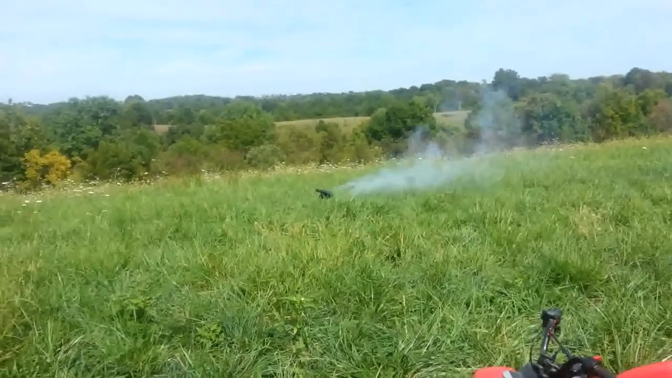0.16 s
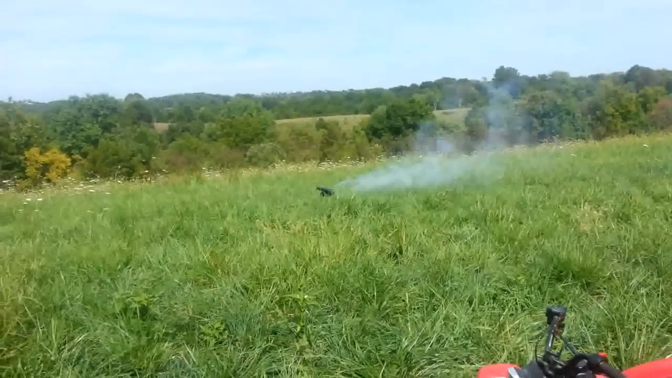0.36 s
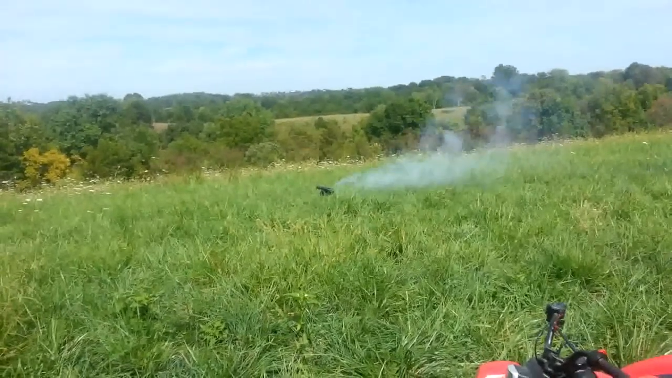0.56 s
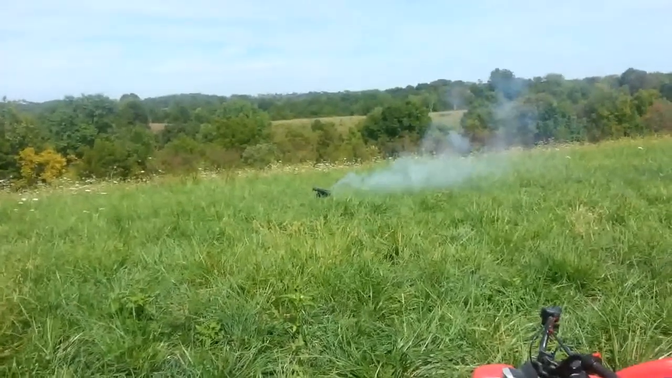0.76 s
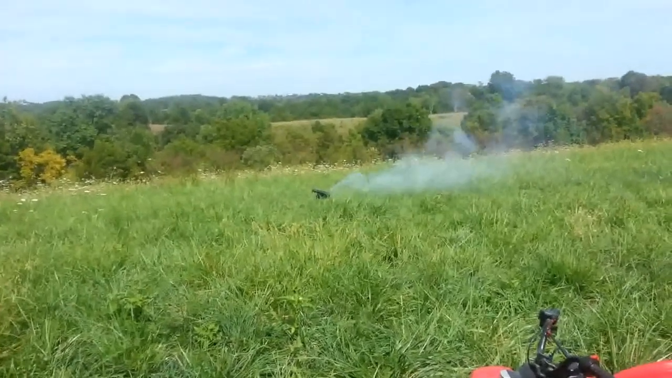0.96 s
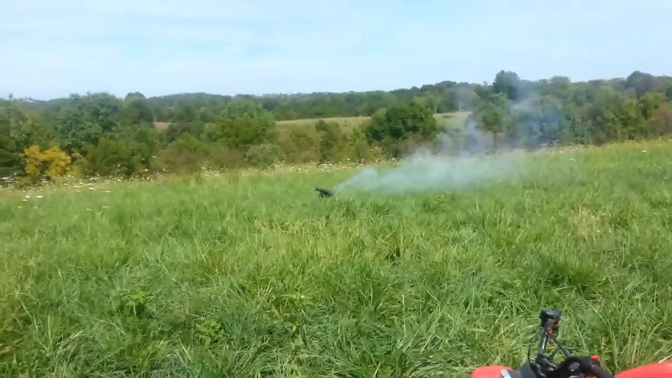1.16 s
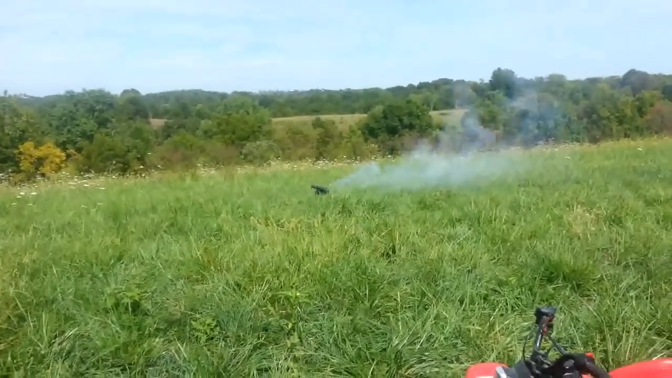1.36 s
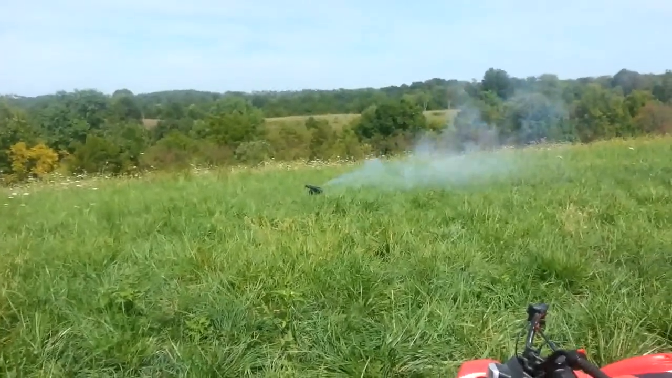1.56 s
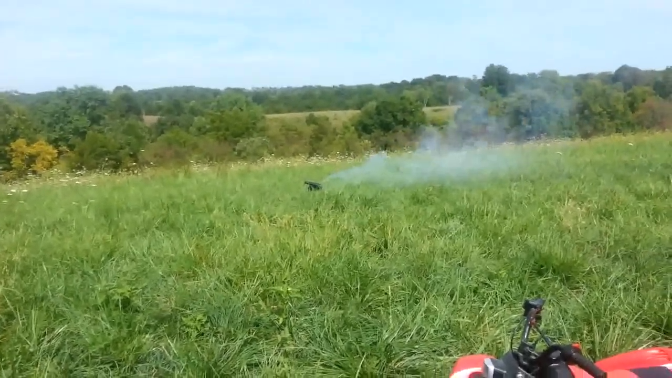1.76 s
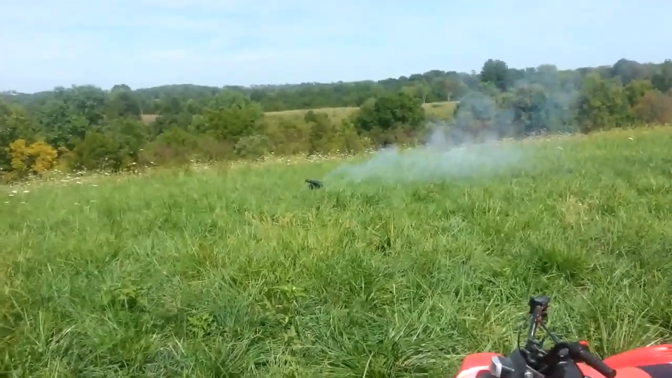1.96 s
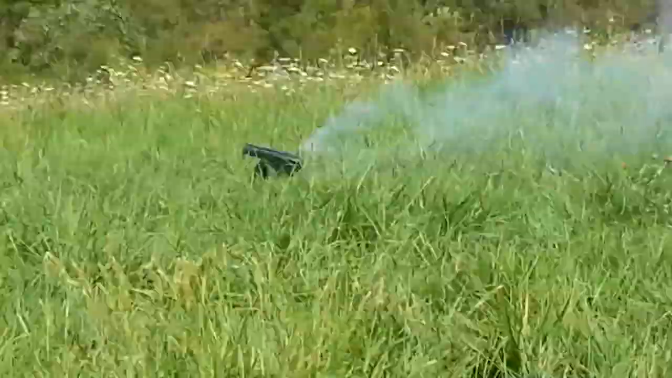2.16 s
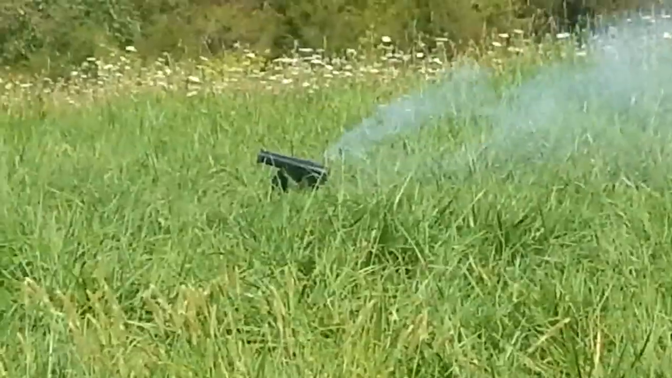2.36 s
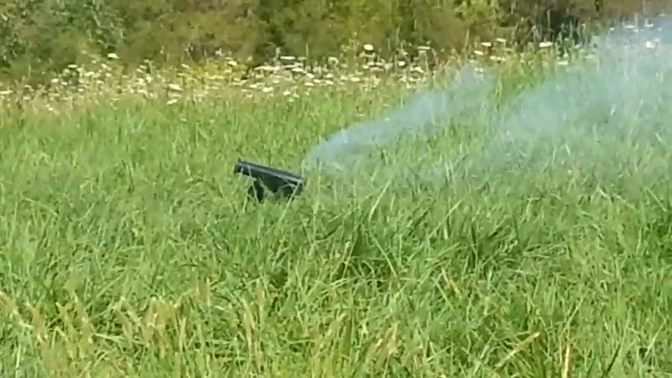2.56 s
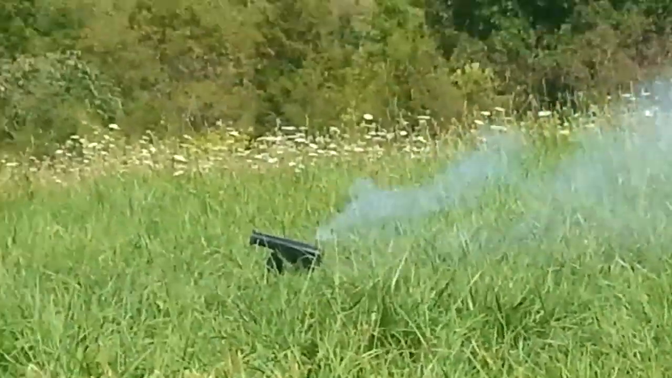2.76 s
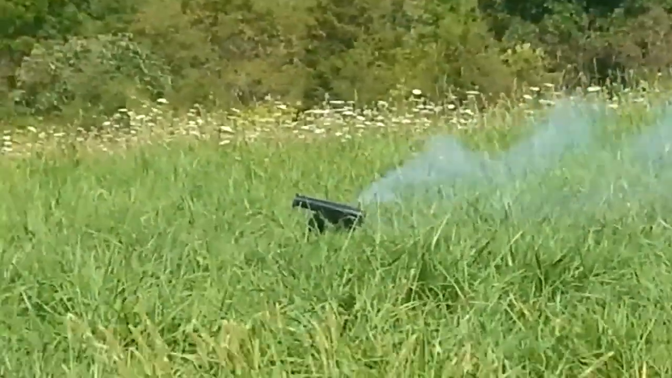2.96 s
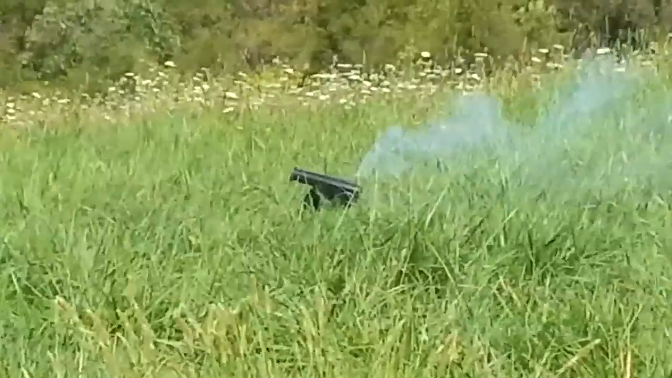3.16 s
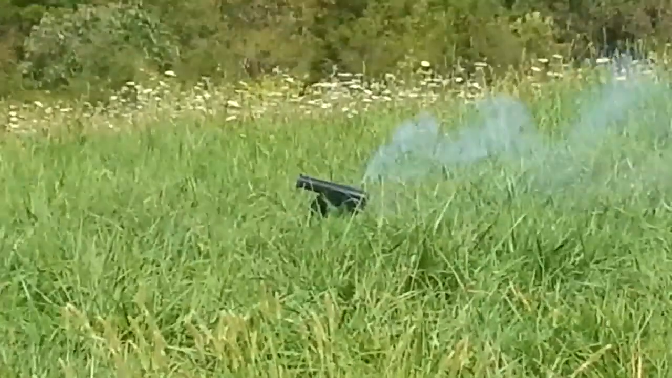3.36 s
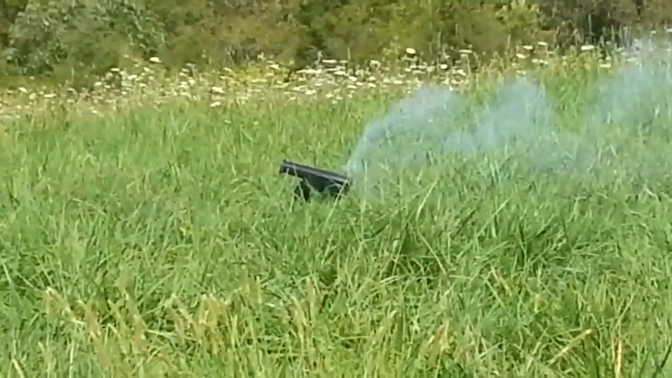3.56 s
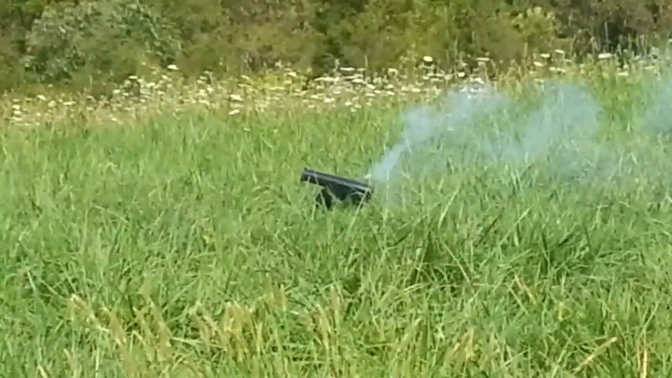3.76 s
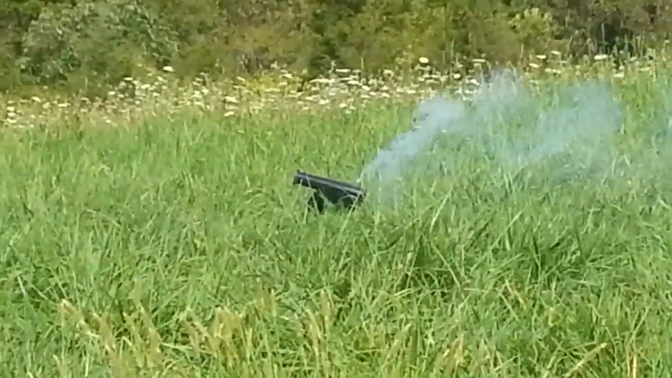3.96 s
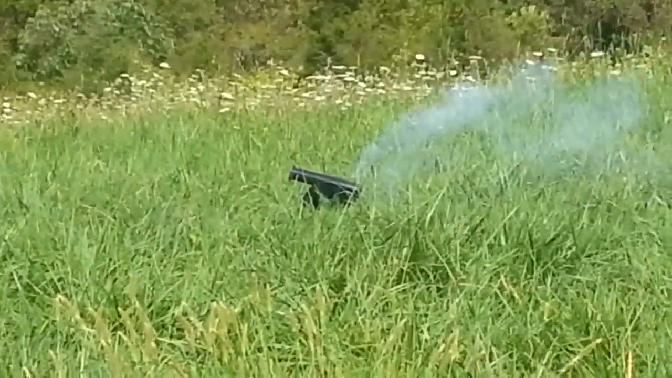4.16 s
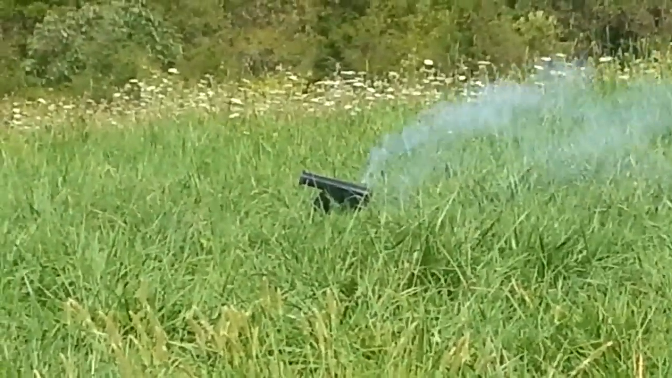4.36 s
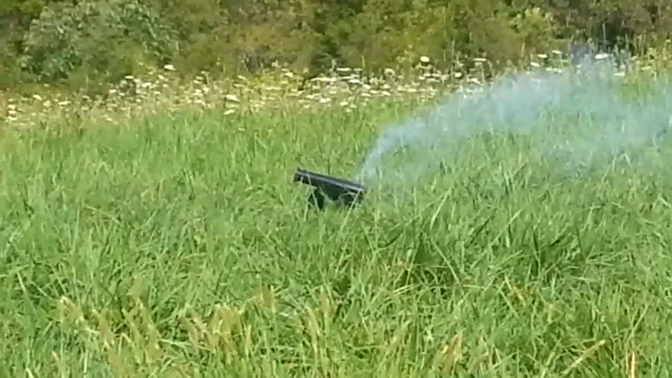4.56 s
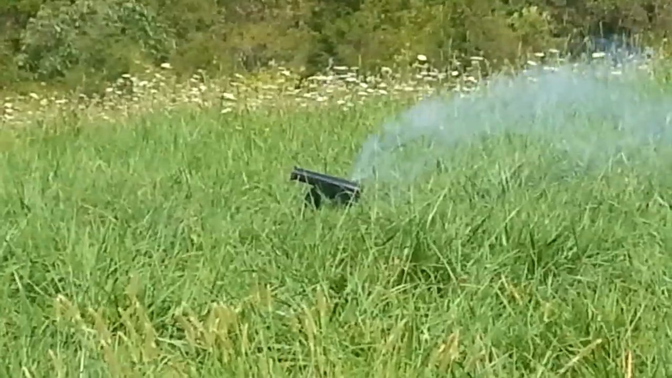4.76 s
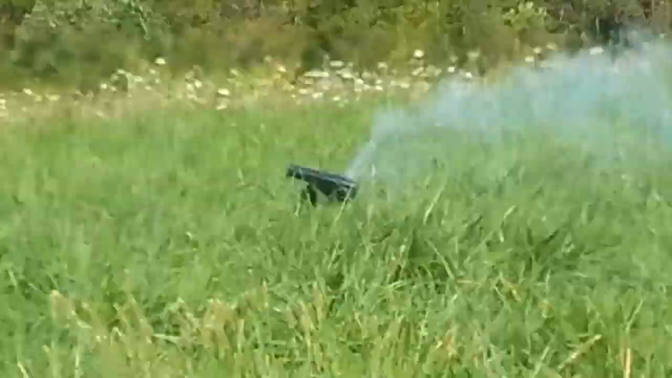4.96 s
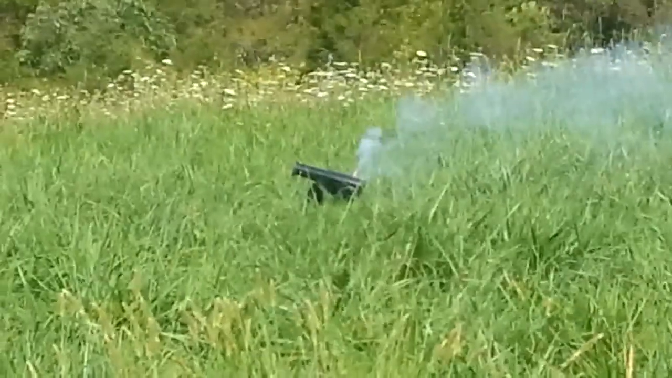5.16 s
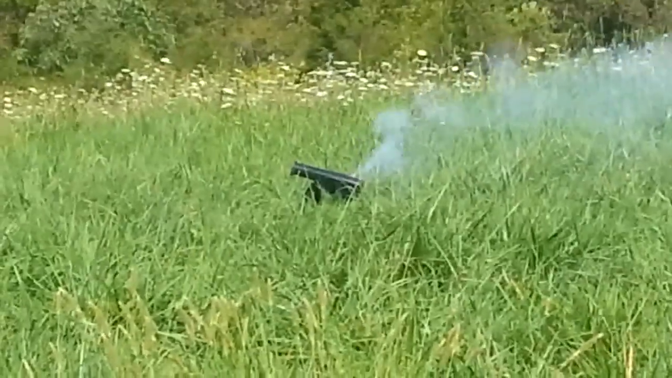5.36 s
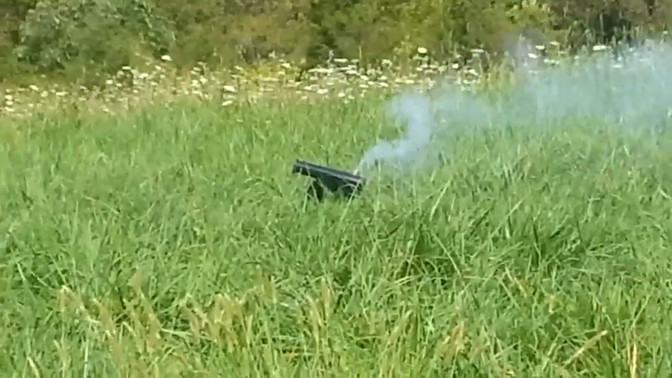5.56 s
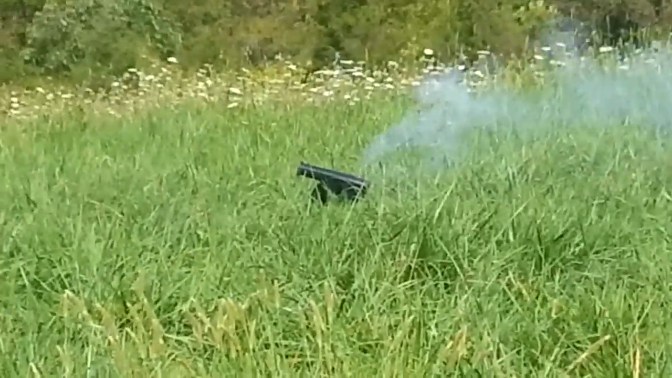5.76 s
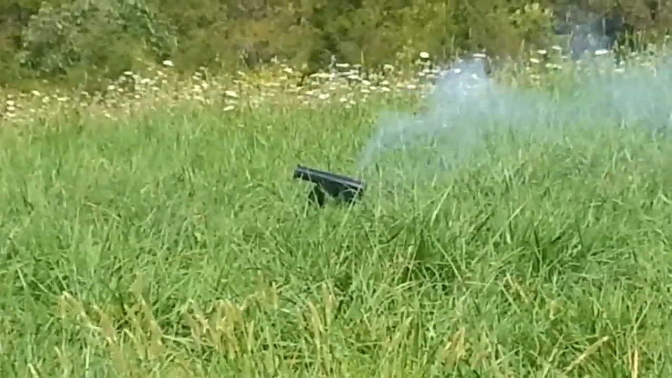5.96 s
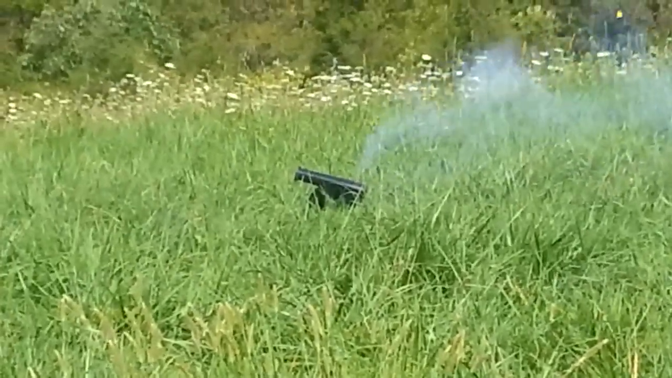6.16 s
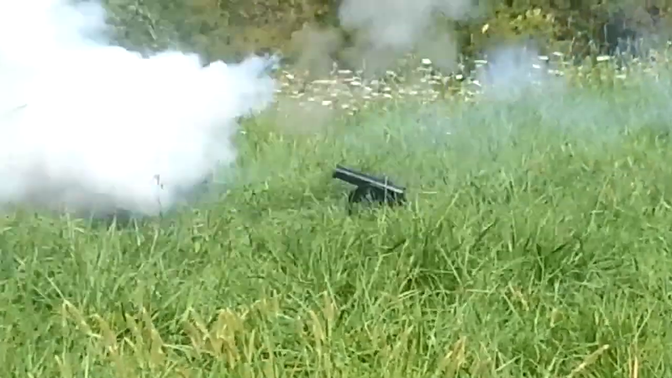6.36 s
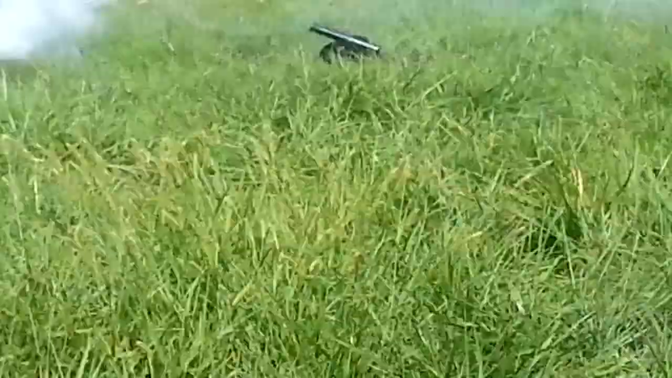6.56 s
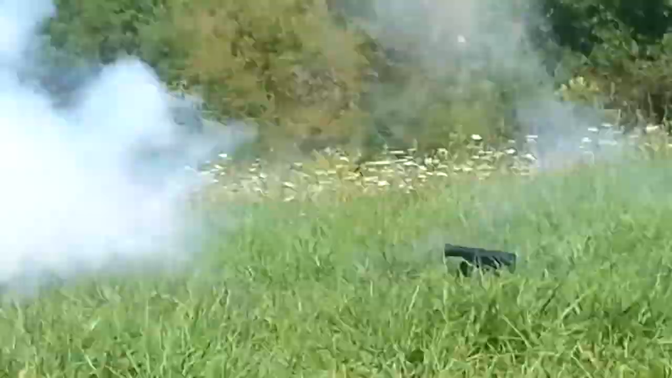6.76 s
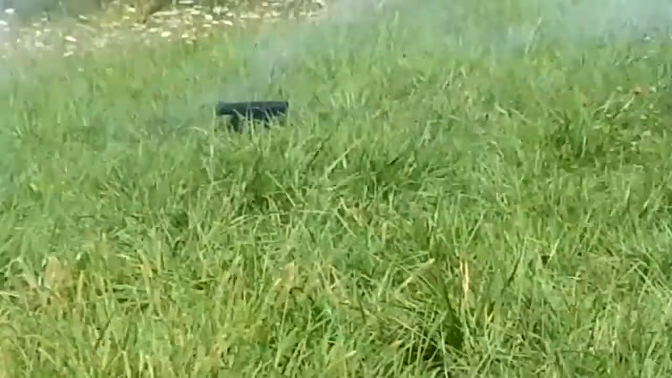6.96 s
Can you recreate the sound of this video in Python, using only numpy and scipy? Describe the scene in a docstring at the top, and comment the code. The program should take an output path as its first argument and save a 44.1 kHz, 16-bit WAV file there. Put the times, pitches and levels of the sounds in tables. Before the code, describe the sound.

Camera microphone outdoors, some way from a small cannon: very quiet field air, high shimmering insects and a thin sputtering fuse hiss. Close dry taps and tiny skin rubs on the camera come mostly in the first half. A lone cricket calls briefly around five seconds, the fuse strengthens, then a violent shot overloads the microphone, rolls over the field, returns from the woods and quickly dies away.

```python
"""A summer meadow: crickets, katydids and soft air, all coloured noise or swept tones gated by wing strokes.
A fuse hisses faintly from the start, while fingers tap and rub on the camera: short rings and friction noise.
A katydid stops buzzing to tick for a while and buzzes again; a tree cricket calls once, shortly before
the fuse flares. Then a small black powder cannon fires: shock pulses and shaped roars overload the
microphones, boom over the field and come back bright from the tree line."""
import sys
import numpy as np
from scipy import signal
from scipy.fft import rfft, irfft, next_fast_len
from scipy.io import wavfile
from scipy.ndimage import uniform_filter1d

SR = 44100
rng = np.random.default_rng(int(sys.argv[2]) if len(sys.argv) > 2 else 0)


def output_pcm(signal):
    """Save a mono or channel-first signal as 16-bit PCM at the path in sys.argv[1].

    Samples are clipped to [-1, 1] before scaling.
    """
    pcm = np.clip(np.atleast_2d(signal).T, -1, 1) * 32767
    wavfile.write(sys.argv[1], SR, np.round(pcm).astype(np.int16))


N = 309564
TIME = np.arange(N) / SR
SIZE = next_fast_len(N, True)
HZ = np.maximum(np.fft.rfftfreq(SIZE, 1 / SR), 1)


def cannon():
    """Shock pulses, the roar of the muzzle gas, the boom over the ground and the echo from the trees."""
    # The paths of the shot: touch hole flash, muzzle blast, gas jet, scatter from the grass; first thump,
    # its roll over the field, its return from the slope, far rumble; edge of the wood, trees behind it.
    # Each row: colour, start in seconds, attack in s, hold in s, level in dB before overload,
    # fall in dB per s, treble tilt in dB per octave, dulling in dB per octave per s.
    arrivals = [("blast", 6.452, 0.019, .001, -29, 800, 1, 5),
                ("blast", 6.469, 0.012, .001, 7.6, 720, 1, 235),
                ("blast", 6.484, 0.0096, 0.02, -2.4, 285, 1.55, 65),
                ("blast", 6.52, 0.026, .05, -17, 41, 0, 68),
                ("boom", 6.467, 0.016, 0.0017, 0.89, 310, .1, 5),
                ("boom", 6.513, 0.013, 0.024, -3.04, 91, .1, 3.5),
                ("boom", 6.605, 0.018, 0.068, -11.5, 127, -1.2, 5),
                ("boom", 6.75, 0.11, .05, -23.5, 15, -1, 3),
                ("trees", 6.703, 0.04, 0.05, -6.5, 91, 3.76, 45.4),
                ("trees", 6.77, 0.086, 0.045, -10, 27, -1.5, 20)]
    sound = shock_slaps()
    for colour, *shape in arrivals:
        sound = sound + scattered(roar(colour), *shape)
    return sound


def shock_slaps(pulse_top_hz=5000, crack_t60=0.0039):
    """The shock wave and its distinct reflections: each a pulse with a short crack."""
    # Each row: start in seconds, level in dB before the pulse is band-passed, pulse length in ms,
    # crack in dB relative to the pulse, left-right difference in dB.
    slaps = [(6.4735, -5, 2.9, -8, -1), (6.59, -7, 1.4, -15, 3), (6.598, 1, 2.7, -30, -12),
             (6.606, 1.5, 7.4, -32, 7), (6.614, 3, 4.3, -34, 3), (6.622, -3, 4.1, -28, 2),
             (6.649, -17, 1.6, -20, 14), (6.689, -0.5, 0.87, -42, 4), (6.7118, -3.5, 0.72, -12, 16),
             (6.895, -14, 2.3, -7, -8), (6.941, -17, 1.4, -31, -3)]
    shocks, t = np.zeros((2, N)), TIME[:SR // 20]
    for s, db, length_ms, crack_db, pan_db in slaps:
        age = t / (length_ms / 1000)
        overpressure = (1 - age) * np.exp(-age)   # a sudden overpressure, then suction
        pulse = band(overpressure, 130, pulse_top_hz)
        crack = from_db(crack_db - 60 * t / crack_t60) * rng.standard_normal(len(t))
        add(shocks, s, panned(from_db(db) * (pulse + crack), pan_db))
    return shocks


def scattered(noise, start_s, attack_s, hold_s, db, fall_db_per_s, tilt_db, dulling_db_per_s):
    """The shot smeared along one path: it swells, holds and dies; later sound came farther and lost treble."""
    start = int(start_s * SR)
    age, rest, out = TIME[:N - start], noise[:, start:], 0
    fall_db = fall_db_per_s * np.maximum(age - attack_s - hold_s, 0)
    envelope = np.minimum(age / attack_s, 1) ** 2 * from_db(db - fall_db)
    # peel off one band after another, from the lowest up
    for octave, edge_hz in enumerate([2000, 4000, 8000, 20000]):
        low = signal.sosfiltfilt(signal.butter(2, edge_hz, fs=SR, output="sos"), rest)
        out = out + low * from_db((tilt_db - dulling_db_per_s * age) * octave)
        rest = rest - low
    return np.pad(out * envelope, [(0, 0), (start, 0)])


def roar(colour, lumps_db=2.5, echo_db=0.5, clumps_db=2.5):
    """The noise of one kind of path: uneven ground makes the boom lumpy, clumps of trees roughen the echo."""
    # Colours of the blast, the boom and the echo from the trees.
    # Each row: frequency in Hz, relative level in dB per Hz.
    blast = [(25, -8.5), (100, 0), (220, 1.5), (700, -4.5), (1200, -1.5), (2400, -4), (4500, 0.5),
             (6000, -6.5), (10000, -8.5), (14500, -11)]
    boom = [(25, -29), (60, -43), (130, -5.5), (220, -4), (350, 1), (680, 2), (1000, -7.5), (1500, -8.5),
            (2400, -8.5), (4000, -20), (6000, -23.5), (14500, -50)]
    trees = [(25, -28), (200, -15.5), (350, -27), (700, 4), (1200, 2), (1700, 1), (2300, 5), (3000, -1.5),
             (4500, -1.5), (6000, -10), (10000, -24), (14500, -40)]
    if colour == "blast":
        return fan_noise(blast, lag_ms=0.4, spread_ms=0.1, shared=0.53)
    if colour == "boom":
        lumps = from_db(lumps_db * drift(110))
        return fan_noise(boom, lag_ms=0.37, spread_ms=0.1, shared=0.016) * lumps
    # the faster drift has stopped before the shot: it only sets a chance level for each echo
    ragged = from_db(echo_db * drift(400) + clumps_db * drift(70))
    return panned(fan_noise(trees, lag_ms=0.36, spread_ms=0.11, shared=.02) * ragged, pan_db=2.5)


def fan_noise(spectrum, lag_ms, spread_ms, shared):
    """A dense, even roar: a share is identical in both channels, the rest reaches the left later."""
    turn = 2 * np.pi * HZ / 1000   # radians per ms
    shared = np.clip(shared, 0, 1)
    fan = np.exp(-(turn * spread_ms) ** 2 / 2 - 1j * turn * lag_ms)
    noise = stereo_noise(spectrum, shared + (1 - shared) * fan, 0)
    power = uniform_filter1d(np.mean(noise ** 2, axis=0), size=700)
    return noise / np.sqrt(power)


def handling(snap_t60=0.0046, body_db=-2.5, crack_db=-0.5, grit_db=-9.5,
             upper_ratio=2.25, upper_db=-9.5, low_share=0.7, panel_db=8.5):
    """Finger taps: each a sharp snap, a dull knock and a two-mode ring, mostly at the nearer microphone."""
    # Fingers tapping the camera. Each row: start in seconds, level in dB before the last band-pass,
    # ring in Hz, ring t60 in s, snap in dB relative to the ring, left-right difference in dB.
    taps = [(0.335, -39.5, 1040, 0.029, -14, -4), (0.6933, -25.5, 1055, 0.034, -2, -3),
            (1.59, -40.5, 407, .025, -12, 19), (1.9025, -26.5, 500, 0.057, -1, 24),
            (1.9076, -4.5, 447, 0.01, -1.5, 19), (1.9194, -18.5, 1940, 0.0045, 5.5, 24),
            (2.176, -42, 520, 0.016, -11, 12), (2.408, -38.5, 635, 0.018, -8, 5),
            (2.469, -41, 560, 0.015, -5, 22), (3.0, -41.5, 530, 0.026, -16, 21),
            (3.016, -40.5, 202, 0.015, -11, 32), (3.084, -32, 487, 0.026, -12, 20),
            (3.155, -43.5, 534, 0.039, -9, 23), (3.23, -33.5, 910, 0.014, -9, -2),
            (3.244, -34, 440, 0.018, -5, 27), (3.251, -42, 810, 0.039, -10, 24),
            (4.423, -43, 844, 0.022, -15, -4), (5.845, -42.5, 230, 0.023, -26, 1),
            (6.169, -45.5, 250, 0.028, -20, 6)]
    out, t = np.zeros((2, N)), TIME[:SR // 16]
    for s, db, hz, t60, snap_db, pan_db in taps:
        grit, fade = rng.standard_normal((2, len(t))), from_db(-60 * t / t60)
        knock = from_db(body_db) * rms_one(band(grit[0], hz / 2, hz * 2))
        # the upper mode fades here and again below, so it dies twice as fast
        upper = from_db(upper_db) * np.sin(2 * np.pi * upper_ratio * hz * t) * fade
        ring = (np.sin(2 * np.pi * hz * t) + upper + knock) * fade
        contact = from_db(grit_db - 60 * t / snap_t60) * grit[1] - from_db(crack_db) * (t == 0)
        dulled = signal.lfilter([1], [1, -.7], band(contact, 340, 9000))
        panel = from_db(panel_db) * band(contact, 1460, 2870)
        snap = from_db(snap_db) * (dulled + panel)
        # a small shell radiates little below its lowest mode
        tap = band(ring + snap, low_share * hz, 26000)
        add(out, s, panned(from_db(db) * tap, pan_db))
    return out


def rubbing():
    """Skin slipping on the shell: short swells of friction in one resonance."""
    # Fingers rubbing and creaking on the camera.
    # Each row: middle in seconds, level in dB, resonance in Hz, width in Hz, length in s.
    rubs = [(1.671, -53, 380, 70, 0.033), (1.793, -56, 338, 60, 0.065), (1.999, -38.5, 780, 400, 0.0054),
            (2.261, -52.5, 1320, 400, 0.01), (2.522, -48, 1370, 350, 0.022),
            (3.224, -44.5, 1090, 250, 0.029), (3.225, -46.5, 650, 500, 0.033),
            (3.781, -47.5, 890, 920, 0.038), (3.898, -53, 1200, 1310, .09), (5.683, -52, 647, 220, 0.057)]
    out, t = np.zeros((2, N)), TIME[:SR // 2] - 1 / 4
    for s, db, hz, width_hz, length_s in rubs:
        low_hz, high_hz = max(hz - width_hz / 2, 60), hz + width_hz / 2
        friction = rms_one(band(rng.standard_normal(len(t)), low_hz, high_hz))
        swell = np.exp(-2 * (t / length_s) ** 2)
        add(out, s + t[0], from_db(db) * friction * swell)
    return out


def katydid(buzz_db=-2.5, pause_db=-67.0, depth=0.65, tick_s=0.0033, tick_db=-46, tick_arch_db=4):
    """A wing-scraped file: fast strokes buzz, single ones tick; others buzz faintly far off."""
    # Buzzes either side of the ticking. Each row: start in seconds, end in s, level in dB before buzz_db.
    buzzes = [(-.45, 2.78, -41.5), (4.65, 6.5, -41.5)]
    # Single wing strokes. One column: time in seconds.
    ticks_s = [3.3228, 3.4046, 3.4784, 3.5518, 3.6331, 3.7294, 3.7987, 3.873, 3.9568, 4.0416, 4.1294,
               4.2382, 4.323, 4.4128, 4.526, 4.6153, 4.748]
    # Colour of the scrape. Each row: frequency in Hz, relative level in dB per Hz.
    scrape = [(7000, -23), (8400, -8.5), (9100, -6.5), (9700, -3.5), (10300, -1), (10800, -2), (11400, 0),
              (12200, -5), (13200, -6), (14500, -5.5)]
    stroke = stroke_phase(91.7, .006)
    pulsing = rms_one(1 + depth * np.cos(2 * np.pi * stroke))
    buzz = from_db(buzz_db) * phrases(buzzes, attack_s=1.54, release_s=0.05) * pulsing
    ticks, t = np.zeros((1, N)), TIME[:SR // 20] - 1 / 50
    # the strokes grow louder to the middle of the run, then fade
    arches = np.sin(np.linspace(0, np.pi, len(ticks_s)))
    for s, arch in zip(ticks_s, arches):
        bump = np.exp(-(t / tick_s - 1) ** 2 / 2)
        add(ticks, s + t[0], from_db(tick_db + tick_arch_db * arch) * bump)
    return np.hypot(buzz + ticks, from_db(pause_db)) * field_noise(scrape, pan_db=-11.0)


def tree_cricket(rate_hz=30.2, low_hz=3150, high_hz=3700):
    """One short pulsed call: a burst of wing strokes, lower in pitch than the ground crickets."""
    # The call. Each row: start in seconds, end in s, level in dB.
    calls = [(5.03, 5.29, -58.5)]
    strokes = np.sin(np.pi * rate_hz * (TIME - calls[0][0]) - np.pi / 2) ** 8
    rasp = rms_one(band(rng.standard_normal(N), low_hz, high_hz) * strokes)
    return panned(phrases(calls, attack_s=0.046, release_s=.03) * rasp, pan_db=-1.5)


def near_cricket(pitch_hz=7850, fall_hz=1000):
    """The nearest ground cricket: a tone whose pitch falls in every wing stroke."""
    # Its songs. Each row: start in seconds, end in s, level in dB.
    songs = [(-.2, 2.9, -55), (4.5, 9.9, -56.5)]
    stroke = stroke_phase(29.2, .015)
    # the chance wavering of the pitch stops early in the second song and leaves one offset
    sweep_hz = pitch_hz - fall_hz * (stroke - .5) + 130 * drift(300)
    phase = 2 * np.pi * np.cumsum(sweep_hz) / SR
    # a quarter turn between left and right
    chirp = rms_one(np.sin(np.pi * stroke) ** 2 * np.array([np.cos(phase), np.sin(phase)]))
    return panned(phrases(songs, attack_s=.55, release_s=0.95) * chirp, pan_db=-3.0)


def cricket_crowd(crowd_db=-0.5):
    """A high trilling crowd of ground crickets: a narrow band of noise at a slowly moving level."""
    # Each row: time in seconds, level in dB before crowd_db.
    levels = [(0.25, -54), (2.22, -49.5), (3.91, -52), (5.51, -52.5), (6.3, -51.5)]
    # Each row: frequency in Hz, relative level in dB per Hz.
    trill = [(6600, -42), (7300, -12), (7650, -8), (8150, -7.5), (8500, -11), (9300, -44)]
    return from_db(in_time(levels)[0] + crowd_db) * field_noise(trill, pan_db=3.0)


def far_chorus(steady_db=-54, flutter_db=1.5):
    """A far chorus: a fluttering band of noise with a few swells over its steady level."""
    # Swells, added in power. Each row: start in seconds, end in s, level in dB before flutter.
    swells = [(1.9, 2.85, -53), (4.12, 4.42, -52), (5.85, 6.15, -51)]
    # Each row: frequency in Hz, relative level in dB per Hz.
    chorus = [(2800, -36), (3250, -1.5), (3600, 3), (4350, 3.5), (4800, -0.5), (5500, -4), (6300, -39)]
    swell = np.hypot(from_db(steady_db), phrases(swells, attack_s=0.053, release_s=0.24))
    return swell * from_db(flutter_db * drift(35)) * field_noise(chorus, pan_db=-1.5)


def fuse(steady_db=-59.5, sputter_db=2.4):
    """Burning powder: hissing noise that sputters unevenly and flares."""
    # Flares, most of all as it burns into the touch hole, added in power.
    # Each row: start in seconds, end in s, level in dB before sputter.
    flares = [(0, .3, -55), (.66, .78, -50), (2.65, 4.6, -52.5), (5.53, 6.47, -48)]
    # Each row: frequency in Hz, relative level in dB per Hz.
    hiss = [(300, -46), (700, -15), (1200, 0), (2400, 2), (4200, 5.5), (6500, 1.5), (9000, 0.5),
            (14500, -7)]
    burn = np.hypot(from_db(steady_db), phrases(flares, attack_s=0.11, release_s=.15))
    return burn * from_db(sputter_db * drift(40)) * field_noise(hiss, pan_db=-1.5)


def meadow_air(air_db=3.5):
    """Soft outdoor air and rustling leaves: broad noise at a slowly moving level."""
    # Each row: time in seconds, level in dB before air_db.
    levels = [(0.2, -50), (1.0, -49.5), (1.3, -50), (3.15, -48.5), (3.33, -51), (4.99, -51.5), (6.3, -50.5)]
    # Each row: frequency in Hz, relative level in dB per Hz.
    air = [(30, -28), (80, -17), (150, -5.5), (320, 0.5), (700, 0.5), (1150, -2), (1700, 0), (2400, 4.5),
           (2950, 1), (4500, -3.5), (6200, -7.5), (9000, -5), (14500, -7)]
    return from_db(in_time(levels)[0] + air_db) * field_noise(air, pan_db=1.5)


def field_noise(spectrum, pan_db):
    """Sound from the whole meadow, coloured by the two microphone ports."""
    # How the ports hear sound from all around.
    # Each row: frequency in Hz, left-right difference in dB, likeness from -1 to 1.
    ports = [(60, 0.5, 0.16), (1400, -2.5, 0.28), (2210, 1.5, 0.51), (2470, 3, -0.03), (3060, -3.5, -0.28),
             (3460, 0, 0.49), (4950, 1.5, 0.63), (6260, -0.5, 0.071), (7650, -10, 0.17), (8700, -4, 0.16),
             (10500, -3.5, 0.3), (11900, -6, 0.1), (14500, -16, -0)]
    balance_db, alike = by_frequency(ports)
    return stereo_noise(spectrum, np.clip(alike, -1, 1), balance_db + pan_db)


def stereo_noise(spectrum, alike, balance_db):
    """Coloured noise of unit power with a given likeness and balance between the channels."""
    colour = from_db(by_frequency(spectrum)[0]) * HZ / np.hypot(HZ, 20)   # less below 20 Hz
    right, other = rfft(rng.standard_normal((2, SIZE)))
    left = alike * right + np.sqrt(np.maximum(1 - np.abs(alike) ** 2, 0)) * other
    lean = from_db(balance_db)
    pair = colour * np.array([lean * left, right]) / np.hypot(lean, 1)
    return rms_one(irfft(pair, SIZE)[:, :N])


def stroke_phase(rate_hz, wander):
    """Position 0-1 within each wing stroke of a nearly steady insect."""
    return np.cumsum(rate_hz * (1 + wander * drift(4.0))) / SR % 1


def phrases(rows, attack_s, release_s):
    """Gain of a sound that swells from each start, holds, and fades after each end."""
    gain = 0
    for start, end, db in rows:
        rise = np.clip((TIME - start) / attack_s, 0, 1)
        fade = np.clip(1 - (TIME - end) / release_s, 0, 1)
        gain = gain + from_db(db) * rise * fade
    return gain


def drift(rate):
    """Chance wandering at rate knots per second; above 200 the knots run out early and the last one holds."""
    knots = rng.standard_normal(int(N / SR * 200))
    return np.interp(TIME * rate, np.arange(len(knots)), knots)


def in_time(rows):
    """Each column of a curve, at every sample."""
    s, *columns = np.transpose(rows)
    return [np.interp(TIME, s, c) for c in columns]


def by_frequency(rows):
    """Each column of a spectrum, at every frequency."""
    hz, *columns = np.transpose(rows)
    return [np.interp(np.log(HZ), np.log(hz), c) for c in columns]


def band(x, low_hz, high_hz):
    """A gentle causal band-pass."""
    sos = signal.butter(2, [low_hz, min(high_hz, .45 * SR)], "band", fs=SR, output="sos")
    return signal.sosfilt(sos, x + 1e-18)


def from_db(db):
    """Decibels to gain."""
    return 10 ** (np.asarray(db) / 20)


def rms_one(x):
    """Scale to unit power."""
    return x / np.sqrt(np.mean(x ** 2) + 1e-20)


def panned(x, pan_db):
    """Share a level difference between left and right."""
    return x * from_db([[pan_db / 2], [-pan_db / 2]])


def add(out, s, sound):
    """Mix a short sound in at time s."""
    at = round(s * SR)
    out[:, at:at + sound.shape[-1]] += sound[..., :N - at]


def scene():
    """The gun, the fingers on the camera and the meadow."""
    insects = katydid() + tree_cricket() + near_cricket() + cricket_crowd() + far_chorus()
    return cannon() + handling() + rubbing() + insects + fuse() + meadow_air()


def record(dry):
    """Overload clips hard at full scale; then a steep low-pass leaves the top 70 dB down from 15300 Hz."""
    clipped = np.clip(dry, -1, 1)
    return signal.sosfilt(signal.cheby2(16, 70, 15300, fs=SR, output="sos"), clipped)


dry = scene()
out = record(dry)
output_pcm(out)
```